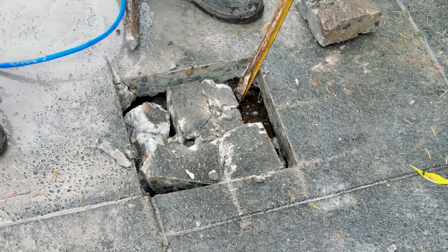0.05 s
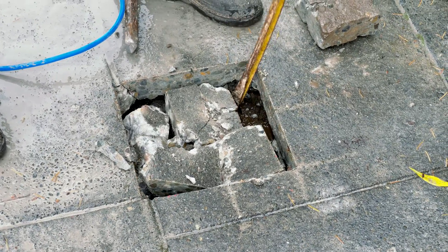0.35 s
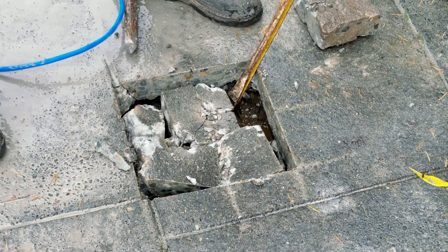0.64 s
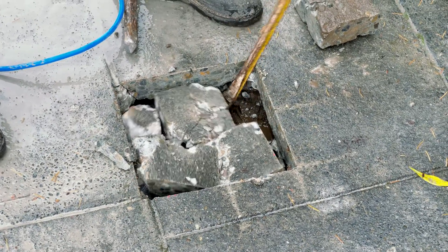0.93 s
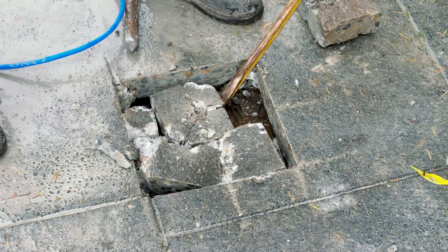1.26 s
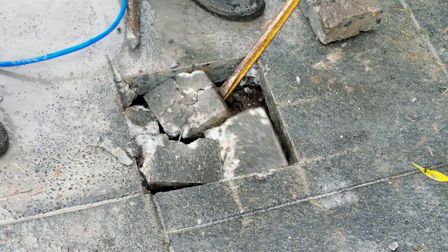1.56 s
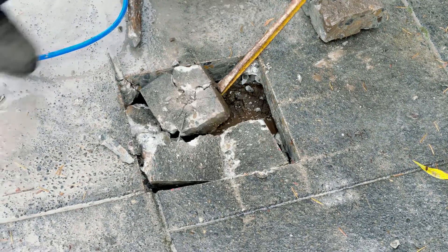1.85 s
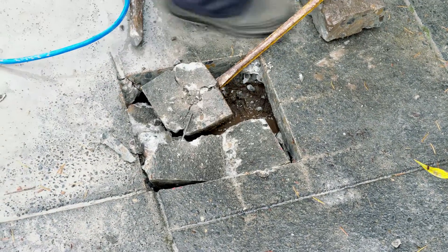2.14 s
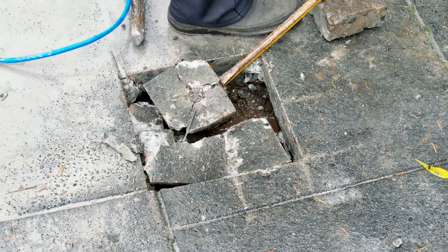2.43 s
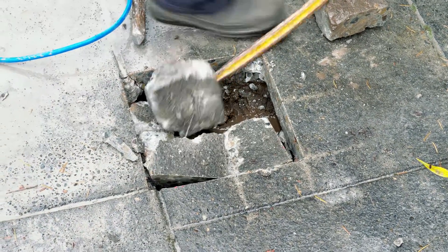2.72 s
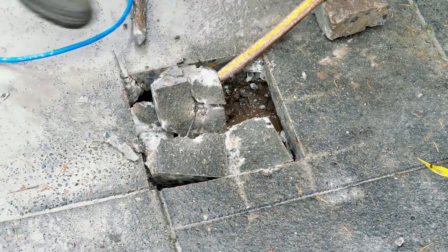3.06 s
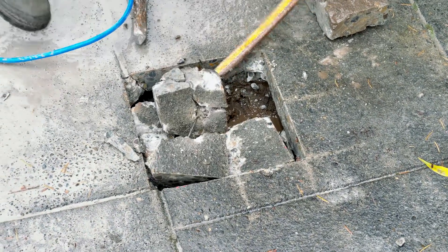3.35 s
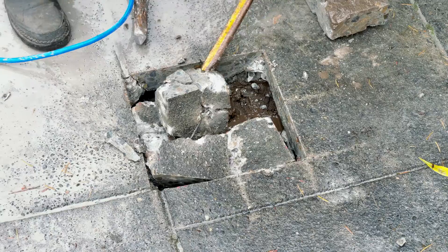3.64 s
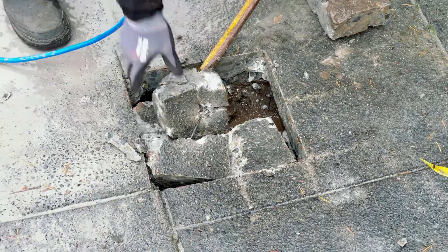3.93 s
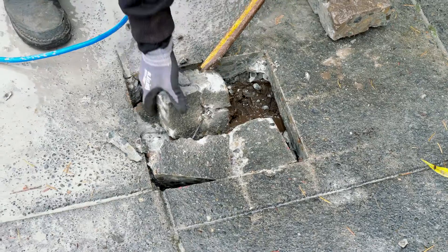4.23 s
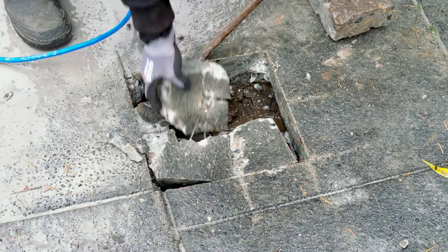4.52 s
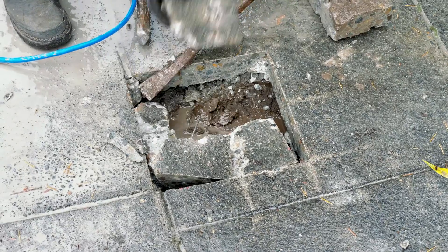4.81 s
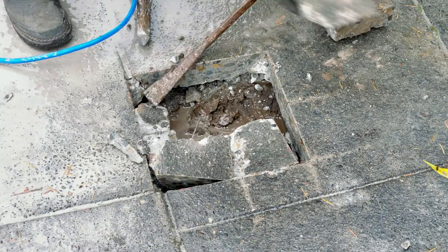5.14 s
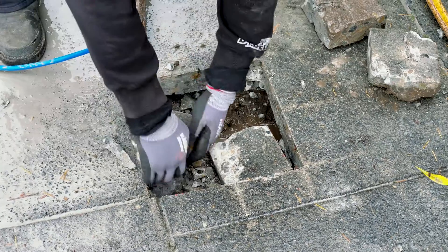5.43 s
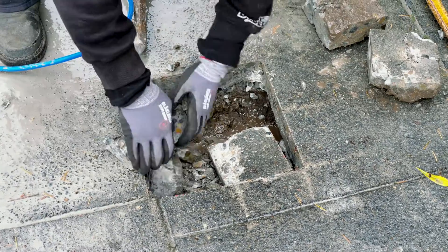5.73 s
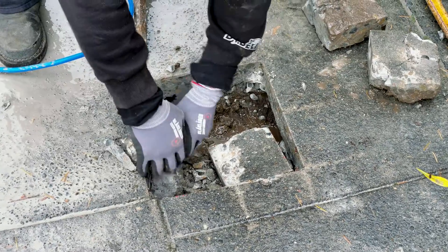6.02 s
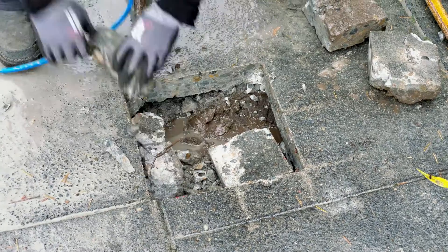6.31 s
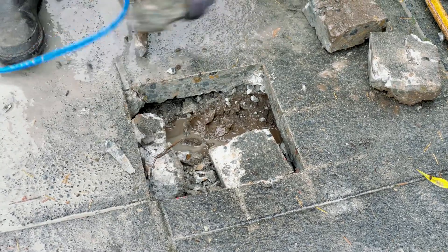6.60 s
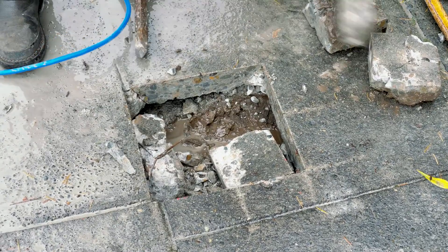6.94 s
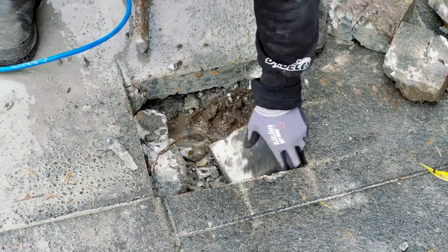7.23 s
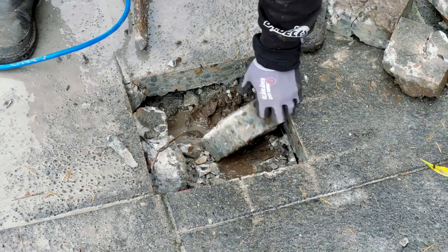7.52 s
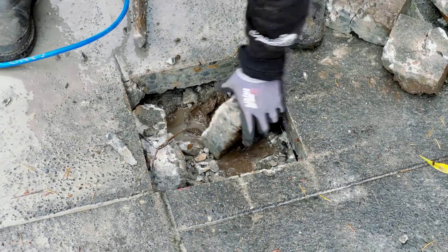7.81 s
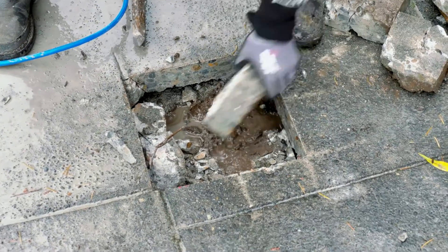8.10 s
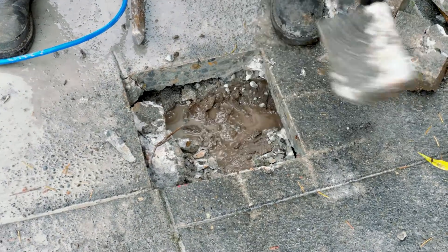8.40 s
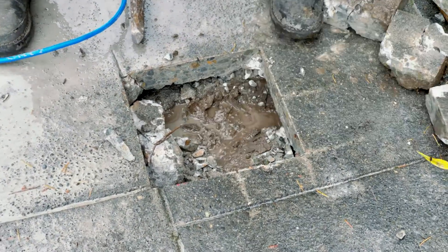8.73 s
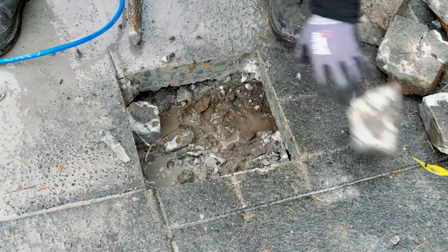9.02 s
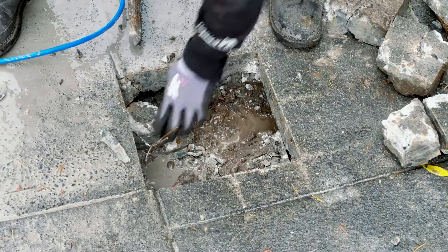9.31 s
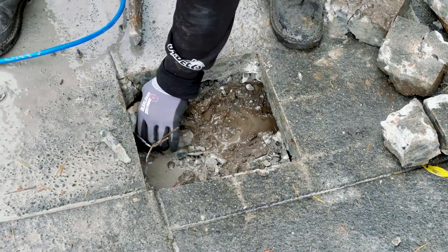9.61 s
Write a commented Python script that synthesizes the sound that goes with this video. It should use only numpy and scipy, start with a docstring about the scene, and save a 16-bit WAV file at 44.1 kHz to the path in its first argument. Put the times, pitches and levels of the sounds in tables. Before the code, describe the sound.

Close by, outdoors, a steel bar pries at cracked paving: gritty crunches, a short squeal and dull thumps as the concrete shifts. Scratchy metal rubbing leads to a ringing clang near the middle. Then chunks clatter and scrape as they are pulled out by hand, and finally drop on firm pavement with hard knocks and a brief screech from the bar. A faint distant town rumble lies underneath.

```python
"""Prying up concrete paving

Broken slabs are levered loose with a steel bar and lifted out by hand. Chunks knock, slip and grind
over grit, thumping the ground. The bar clangs when struck, scrapes on concrete and squeals in
stick-slip. The last pieces drop on firm pavement nearby, over a quiet outdoor background."""
import sys
import numpy as np
from scipy import signal
from scipy.fft import rfft, irfft, next_fast_len
from scipy.io import wavfile
from scipy.ndimage import uniform_filter1d, map_coordinates

SR = 44100
rng = np.random.default_rng(int(sys.argv[2]) if len(sys.argv) > 2 else 0)


def inscribe(sig):
    """Save sig as 16-bit PCM at rate SR to the path in sys.argv[1].

    A 1-D sig is mono; a 2-D sig holds one channel per row.
    Samples are clipped to [-1, 1] before scaling.
    """
    pcm = np.round(np.clip(np.atleast_2d(sig).T, -1, 1) * 32767)
    wavfile.write(sys.argv[1], SR, pcm.astype(np.int16))


N = 426006

# spectrum of crushed concrete: f/Hz, level/dB
CRUNCH_SPECTRUM = [(120, -22.5), (350, -2), (750, 7), (1200, -4.5), (3500, 2.5), (4800, -16.5), (9000, -45)]
# spectrum of cracking grit: f/Hz, level/dB
GRIT_SPECTRUM = [(1500, -11), (4500, -3), (9000, -4.5), (15500, -10)]
RELEASE_T60_S = 0.22  # run-out of a stroke


def knocks(clack_t60_s=0.019, tick_t60_s=0.015, thud_t60_s=0.25, tail_t60_s=0.26, tail_db=-19, dust_db=-24):
    """Each contact rings a chunk's damped modes, cracks off grit and thumps the ground."""
    # chunk contacts: t/s, thud/dB, clack/dB, tick/dB, clack f/Hz
    chunk_hits = [(0.0205, -31.5, -22, -27, 1350), (0.4536, -56, -29, -47, 1970),
                  (0.941, -54, -34, -46, 1750), (1.018, -26, -24, -33, 2410), (1.049, -36, -31, -32, 1980),
                  (1.631, -36.5, -33, -33, 9050), (2.545, -44.5, -54, -59, 324), (2.58, -45, -43, -46, 376),
                  (2.654, -42.5, -32, -65, 1565), (2.79, -34.5, -33.5, -56, 1000),
                  (2.941, -70, -44, -34, 3870), (4.348, -45, -50, -34, 2240), (4.544, -33, -22, -41, 660),
                  (4.63, -42, -28, -50, 540), (5.602, -36.5, -28.5, -47, 473), (6.177, -32, -23, -45, 670),
                  (6.18, -38, -24, -79, 800), (6.211, -40, -29, -32.5, 1710),
                  (6.288, -34, -25.5, -34, 2770), (6.3, -35, -26.5, -25.5, 1100),
                  (6.33, -26, -25.5, -31.5, 680), (7.026, -32.5, -24, -32, 1324),
                  (7.16, -38, -38.5, -70, 1075), (7.248, -40.5, -25.5, -53, 3790),
                  (7.38, -70, -36, -39, 616), (7.411, -39.5, -40, -60, 2230),
                  (8.612, -25, -17.5, -29.5, 778), (8.634, -56, -22, -41.5, 1360),
                  (8.694, -37, -29, -45.5, 546), (9.129, -30, -18, -33, 874),
                  (9.163, -31.5, -24.5, -47, 890), (9.209, -47, -50, -35.5, 1260),
                  (9.266, -34.5, -37, -47.5, 1010)]
    # loose pebbles hitting the slabs: t/s, clack/dB
    pebble_clicks = [(0.712, -44), (1.085, -41), (2.737, -44), (5.724, -68), (6.427, -49.5), (6.6814, -51),
                     (6.718, -54), (8.953, -50.5), (9.486, -52)]
    pebble_hits = [(s, db - 19, db, db - 0.5, 3230) for s, db in pebble_clicks]  # columns as chunk_hits
    out, t, n_modes = np.zeros(N), np.arange(SR // 4) / SR, 16
    radiation = signal.butter(2, 230, "high", fs=SR, output="sos")
    for s, thud_db, clack_db, tick_db, hz in chunk_hits + pebble_hits:
        ratios = np.exp(np.linspace(-1.3, .9, n_modes) + rng.normal(0, 0.11, n_modes))
        modes_hz = np.minimum(hz * ratios, SR / 3)[:, None]
        weights = rng.choice([-1, 1], (n_modes, 1)) / (1 + (np.log(modes_hz / hz) / 0.55) ** 2)
        tones = (weights * np.sin(2 * np.pi * modes_hz * t)).sum(0)
        ring = signal.sosfilt(radiation, tones * decay(t, clack_t60_s))
        # the surroundings scatter the clack into a toneless tail
        scatter = unit(signal.fftconvolve(noise(len(t)), ring * np.exp(-t * hz / 2))[:len(t)])
        clack = unit(ring, 0.0014) + amp(tail_db) * scatter * decay(t, tail_t60_s)
        tick = patchy(noise(len(t)), GRIT_SPECTRUM)
        tick *= decay(t, tick_t60_s) + amp(dust_db) * decay(t, tail_t60_s)
        force = (t == 0) + 0.028 * noise(len(t)) * decay(t, thud_t60_s)
        add(out, s, amp(thud_db) * unit(ground(force, s), 0.041))
        add(out, s, amp(clack_db) * unit(clack, 0.013))
        add(out, s, amp(tick_db) * unit(tick, 0.0071))
    return out


def slips(rise_s=0.0024, thud_t60_s=0.069, crunch_t60_s=0.12, grit_t60_s=0.13):
    """A jammed chunk gives way, crushing a burst of grains and shaking the slabs."""
    # slips: t/s, length/s, thud/dB, crunch/dB, grit/dB
    slip_events = [(0.001, 0.016, -26, -21, -33), (0.115, 0.028, -48, -44, -39),
                   (0.195, 0.081, -31, -37.5, -49), (0.493, 0.022, -24.5, -26, -35.5),
                   (0.519, 0.0028, -35, -20, -33.5), (0.987, 0.048, -27.5, -20.5, -29.5),
                   (1.048, 0.016, -25, -24.5, -38), (1.441, 0.0072, -29.5, -24, -32.5),
                   (1.466, 0.045, -22, -25.5, -37), (1.56, 0.015, -33, -28.5, -32),
                   (1.689, 0.0033, -46, -32, -31), (2.21, 0.017, -40.5, -35.5, -33),
                   (2.79, 0.071, -39.5, -33, -45), (2.857, 0.011, -35.5, -25, -34),
                   (5.608, 0.0091, -46, -43, -26), (7.228, 0.025, -37, -44, -44),
                   (8.763, 0.0076, -33, -36, -40.5)]
    out, n, lead_s = np.zeros(N), SR // 4, 0.02
    t = np.arange(n) / SR - lead_s
    attack = np.exp(np.minimum(t, 0) / rise_s)
    for s, length_s, thud_db, crunch_db, grit_db in slip_events:
        fading_s = np.maximum(t - 0.54 * length_s, 0)
        sliding = (t >= 0) & (t < length_s)
        judder = amp(2.66 * wobble(246.7, n))
        thud = ground(noise(n) * attack * decay(fading_s, thud_t60_s), s)
        crunch = patchy(grains(n, per_s=1200, spread_db=-2, hiss=0.41), CRUNCH_SPECTRUM)
        crunch *= judder * attack * decay(fading_s, crunch_t60_s)
        grit = patchy(grains(n, per_s=3700, spread_db=3.0, hiss=0.25), GRIT_SPECTRUM)
        grit *= judder * attack * decay(fading_s, grit_t60_s)
        for layer, db in (thud, thud_db), (crunch, crunch_db), (grit, grit_db):
            add(out, s - lead_s, amp(db) * layer / rms(layer[sliding]))
    return out


def ground(force, s=0, pavement_from_s=8.5):
    """The slabs boom at low, damped resonances; firm pavement lacks the deepest."""
    # slabs on their bed: f/Hz, width/Hz, level/dB
    slab_modes = [(131, 20.6, 6.5), (231, 41, 2), (296, 29, 0), (460, 220, -10)]

    def response(f):
        return sum((-1) ** k * amp(db) * 1j * f * width / (hz * hz - f * f + 1j * f * width)
                   for k, (hz, width, db) in enumerate(slab_modes))

    order, low_hz = (2, 210) if s > pavement_from_s else (4, 90)
    band = signal.butter(order, [low_hz, 650], "band", fs=SR, output="sos")
    return signal.sosfilt(band, filtered(force, response))


def grinding(work_end_s=8.15, flurries_per_s=55, flurry_s=0.002, crumb_db=-8.5):
    """Dragged concrete rumbles, scrapes and sheds grit, catching unevenly."""
    # shoves over grit: t/s, length/s, rumble/dB, scrape/dB, grit/dB
    drags = [(0.2, 0.35, -35, -37.5, -47.5), (0.944, 0.13, -39, -35, -46), (1.162, 0.19, -53, -49.5, -48),
             (1.415, 0.15, -40, -37.5, -33.5), (1.629, 0.25, -54.5, -44, -41), (1.897, 0.27, -55, -49, -60),
             (2.381, 0.071, -51, -45.5, -48), (2.714, 0.2, -43, -40.5, -40.5), (3.158, 0.3, -55, -55, -65),
             (3.392, 0.32, -41.5, -43, -50.5), (3.846, 0.063, -53.5, -48, -64),
             (4.334, 0.15, -41.5, -43, -45), (5.557, 0.082, -42, -44.5, -48),
             (6.192, 0.12, -66, -33, -32.5), (7.093, 0.19, -43, -45.5, -51), (7.346, .13, -61, -45, -44)]
    # gloves and stone brushing sand: t/s, length/s, level/dB
    brushes = [(0.612, 0.15, -56), (6.557, 0.072, -46), (6.91, 0.036, -51.5), (7.558, 0.21, -44),
               (7.8, 0.03, -48), (7.889, 0.015, -41.5), (8.39, 0.066, -44.5)]
    settling_db = (-60.5, -58.5, -59)  # rubble between strokes: rumble, scrape, grit
    working = np.clip((work_end_s - np.arange(N) / SR) / RELEASE_T60_S, 0, 1)
    gains = np.outer(amp(settling_db), working)
    rumble_gain, scrape_gain, grit_gain = gains
    for s, length_s, *levels_db in drags:
        for gain, db in zip(gains, levels_db):
            add(gain, s, amp(db) * stroke(length_s))
    for s, length_s, db in brushes:
        add(grit_gain, s, amp(db) * stroke(length_s))
    sand_breaks = (rng.random(N) < flurries_per_s / SR) * rng.uniform(.5, 3.2, N)
    flurries = signal.lfilter([1], [1, -np.exp(-1 / (flurry_s * SR))], sand_breaks)
    catch = unit(amp(2.48 * wobble(70) + 3.7 * wobble(12)) * (1 + 0.38 * flurries))
    rumble = amp(3.0 * wobble(14)) * unit(ground(noise(N)))
    scrape = catch * patchy(grains(N, per_s=4000, spread_db=1.5, hiss=0.91), CRUNCH_SPECTRUM, depth_db=3.5)
    grit = catch * patchy(grains(N, per_s=4000, spread_db=5.5, hiss=1.0), GRIT_SPECTRUM)
    return rumble_gain * rumble + scrape_gain * (scrape + amp(crumb_db) * crumbs()) + grit_gain * grit


def crumbs(per_s=70, centre_hz=3600, spread_oct=0.86, decay_cycles=1.2):
    """Crumbs snap, each a dry click of its own pitch and size; rms 1."""
    out, t = np.zeros(N), np.arange(SR // 100) / SR
    for when, pitch, size in rng.random((int(per_s * N / SR), 3)):
        hz = centre_hz * 2 ** (spread_oct * np.tan(2 * pitch - 1))
        click = np.sin(2 * np.pi * hz * t) * np.exp(-t * hz / decay_cycles)
        add(out, when * N / SR, amp(-4 * np.log(size + .05)) * click)
    return unit(out)


def steel_bar(shimmer_db=-9):
    """One set of bar modes sounds in clangs, a screech and rubs."""
    # bending modes: f/Hz, level/dB
    bending_modes = [(458, 4), (794, -1), (966, -6), (1443, -4), (1558, -2), (1834, 0), (2084, -6),
                     (2566, 3), (2922, -4), (3095, -2), (3472, -3), (3537, -6), (3621, -5), (3991, 1),
                     (4164, -6), (4624, -8), (4838, -3), (4975, -6), (5555, -9), (5687, -8), (6171, -6),
                     (6557, -10), (6924, -7)]
    # high modes: from/Hz, to/Hz, spacing/Hz
    shimmer_hz = (7500, 15500, 490)
    high_modes = [(hz + shimmer_hz[2] * (rng.random() - .5), shimmer_db) for hz in np.arange(*shimmer_hz)]
    modes = bending_modes + high_modes
    return bar_clangs_and_screech(modes) + bar_rubs(modes)


def bar_clangs_and_screech(modes):
    """The bar clangs when struck, or gives a short rough screech that stops abruptly."""
    # bar contacts: t/s, level/dB, contact f/Hz, t60/s, rise/s, time to stop/s, chatter share
    contacts = [(4.546, -24.5, 1400, 0.6, 0.0043, 0.79, 0.56),
                (4.58, -35.5, 4400, 1.3, 0.0022, 0.84, 0.027), (8.758, -26.5, 3300, 0.93, 0.01, 0.06, 0.9)]
    out, t = np.zeros(N), np.arange(SR * 3 // 4) / SR
    for s, db, contact_hz, t60_s, rise_s, stop_s, share in contacts:
        ring = bar_ring(modes, t, contact_hz, t60_s)
        # chatter on the stone broadens the tones
        chatter = signal.fftconvolve(noise(len(t)) * decay(t, .5), ring * decay(t, 0.042))[:len(t)]
        rough_ring = unit(ring, 0.086) + share * unit(chatter, 0.03)
        attack = 1 - np.exp(-t / rise_s)
        damping = np.exp(-np.maximum(t - stop_s, 0) / .001)
        add(out, s, amp(db) * rough_ring * attack * damping)
    return out


def bar_rubs(modes, pressed_t60_s=0.14, scratch_db=-8):
    """Rubbing feeds the bar's modes a ragged stream of tiny, scratchy hits."""
    # blade on concrete: t/s, length/s, level/dB, contact f/Hz
    rubs = [(1.355, 0.015, -40, 3600), (1.557, 0.011, -38, 12000), (2.58, 0.028, -40, 5200),
            (2.76, 0.19, -44, 6100), (3.356, 0.058, -44, 6000), (3.416, 0.008, -33, 5000),
            (3.45, 0.0081, -38, 5000), (3.528, 0.014, -36, 4500), (3.605, 0.17, -51, 3400),
            (4.178, 0.15, -50.5, 5700), (4.271, 0.17, -42.5, 3300), (4.4, 0.062, -36, 4370),
            (4.591, 0.05, -34, 8500), (4.748, 0.13, -43, 5500), (5.04, 0.2, -48, 3300),
            (5.226, 0.032, -41, 9000), (6.284, 0.021, -35.5, 8750)]
    out, t = np.zeros(N), np.arange(SR // 5) / SR
    highpass = signal.butter(2, 1000, "high", fs=SR, output="sos")
    for s, length_s, db, contact_hz in rubs:
        force = stroke(length_s)
        n, span_s = len(force), length_s + pressed_t60_s / 10
        force *= amp(5.4 * wobble(58.8, n))
        hits = signal.sosfilt(highpass, force * grains(n, per_s=600, spread_db=3.0, hiss=0.32))
        ring = signal.fftconvolve(hits, bar_ring(modes, t, contact_hz, pressed_t60_s))[:n]
        lowpass = signal.butter(1, min(contact_hz, SR / 3), fs=SR, output="sos")
        scratch = signal.sosfilt(lowpass, hits)
        add(out, s, amp(db) * (unit(ring, span_s) + amp(scratch_db) * unit(scratch, span_s)))
    return out


def bar_ring(modes, t, contact_hz, t60_s, half_width_oct=0.82):
    """One touch excites the modes near its contact pitch."""
    ring = np.zeros(len(t))
    for hz, db in modes:
        coupling = 1 / (1 + (np.log2(hz / contact_hz) / half_width_oct) ** 2)
        ring += coupling * amp(db + 2 * rng.standard_normal()) * np.sin(2 * np.pi * (hz * t + rng.random()))
    return ring * decay(t, t60_s)


def squeal(stutter_db=3.5, rough_rad=0.45, glide_per_s=0.049):
    """The wedged blade sticks and slips in rough tones that rise slightly with the load."""
    # squeal envelope: t/s, level/dB
    envelope = [(.2, -58), (.23, -37), (.3, -32), (.375, -35), (.455, -51)]
    # blade tones: f/Hz, level/dB
    blade_tones = [(2476, -38.5), (3736, -38), (4640, -34.5), (5100, -50), (5426, -46), (7418, -49),
                   (9674, -49), (10487, -59)]
    times_s, levels_db = np.transpose(envelope)
    n = int(times_s[-1] * SR)
    t, shake, tones = np.arange(n) / SR, wobble(152.4, n), np.zeros(n)
    glide_clock = t + glide_per_s * (t - times_s.mean()) ** 2 / 2
    for hz, db in blade_tones:
        gain = amp(db + 2.3 * wobble(35.3, n))
        jitter = rough_rad * (shake + 2 * wobble(69.4, n))
        tones += gain * np.sin(2 * np.pi * hz * glide_clock + jitter)
    stutter = amp(stutter_db * wobble(59.6, n))
    swell = amp(np.interp(t, times_s, levels_db)) * (t > times_s[0])
    return np.pad(swell * unit(tones * stutter), (0, N - n))


def background(level_db=-58):
    """Distant town rumble and soft hiss."""
    # outdoor spectrum: f/Hz, level/dB
    air_spectrum = [(25, -31.5), (80, -0.5), (137, -3.5), (840, -20), (1160, -28.5), (3520, -20),
                    (5280, -28), (11900, -26), (16000, -36.5)]
    return amp(level_db + wobble(2.4)) * unit(coloured(noise(N), air_spectrum))


def stroke(length_s, swell_share=0.1, sag_db=7.5):
    """Force of one push: swells, sags as the piece moves, runs out."""
    t = np.arange(int((length_s + .4) * SR)) / SR
    swell = np.minimum(t / (swell_share * length_s), 1)
    sag = amp(-sag_db * np.minimum(t / length_s, 1))
    return swell * sag * decay(np.maximum(t - length_s, 0), RELEASE_T60_S)


def grains(n, per_s, spread_db, hiss):
    """Sand cracking: random impulses of unequal size over hiss."""
    sizes = amp(spread_db * np.minimum(rng.exponential(size=n), 4)) * rng.choice([-1, 1], n)
    return unit(sizes * (rng.random(n) < per_s / SR)) + hiss * noise(n)


def patchy(x, spectrum, depth_db=4.5):
    """Colour x; resonances come and go as the contact points shift; rms 1."""
    frames = signal.stft(coloured(x, spectrum), nperseg=512)[2]
    patches = uniform_filter1d(noise(frames.shape), size=6, axis=0)
    patches = uniform_filter1d(patches, size=5, axis=1)
    return unit(signal.istft(frames * amp(depth_db * unit(patches)), nperseg=512)[1][:len(x)])


def coloured(x, spectrum, size=1024):
    """Minimum-phase filter through points f/Hz, level/dB."""
    hz, db = np.transpose(spectrum)
    bins_db = np.interp(np.log(np.fft.rfftfreq(size, 1 / SR) + 1), np.log(hz), db)
    cepstrum = irfft(np.log(amp(bins_db)))
    cepstrum[1:size // 2] *= 2
    cepstrum[size // 2 + 1:] = 0
    return signal.fftconvolve(x, irfft(np.exp(rfft(cepstrum))))[:len(x)]


def filtered(x, response):
    """Apply a complex frequency response."""
    size = next_fast_len(len(x) + 8192)
    return irfft(rfft(x, size) * response(np.fft.rfftfreq(size, 1 / SR)), size)[:len(x)]


def wobble(knots_per_s, n=N):
    """Smooth random curve."""
    return map_coordinates(noise(int(n * knots_per_s / SR) + 4), [np.arange(n) * knots_per_s / SR])


def noise(shape):
    return rng.standard_normal(shape)


def amp(db):
    return 10 ** (np.asarray(db) / 20)


def decay(t, t60_s):
    return amp(-60 * t / t60_s)


def rms(x):
    return np.sqrt(np.mean(x ** 2) + 1e-20)


def unit(x, span_s=None):
    """Scale to rms 1 over the first span_s, or over all of x."""
    return x / rms(x[:int(span_s * SR) if span_s else None])


def add(track, s, x):
    """Mix x into the track at time s."""
    x = x[max(0, -round(s * SR)):]
    part = track[max(0, round(s * SR)):][:len(x)]
    part += x[:len(part)]


def scene():
    """Concrete, bar and open air, mono."""
    return (knocks() + slips() + grinding() + steel_bar() + squeal() + background())[None]


def record(dry, cutoff_hz=16000):
    """Steep low-pass."""
    return filtered(dry[0], lambda hz: 1 / (1 + (hz / cutoff_hz) ** 120))[None]


dry = scene()
out = record(dry)
inscribe(out)
```